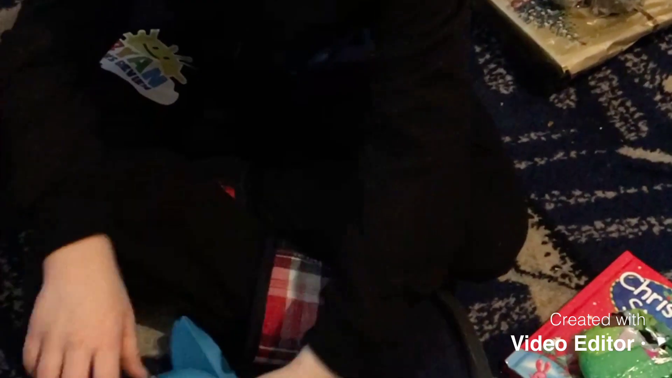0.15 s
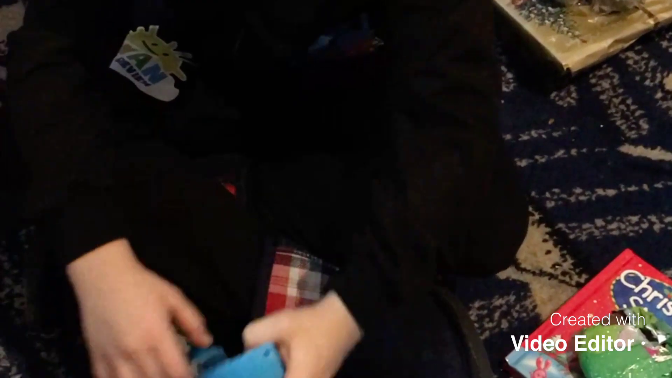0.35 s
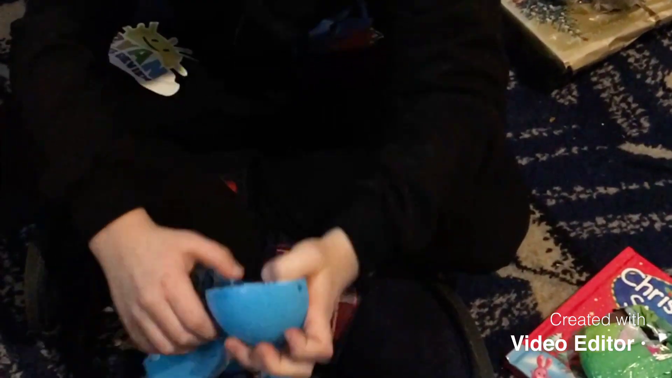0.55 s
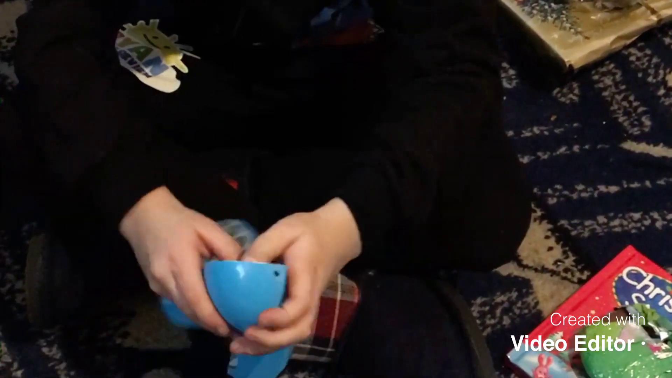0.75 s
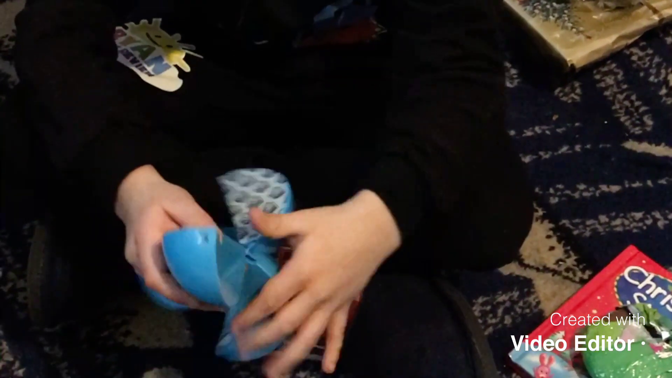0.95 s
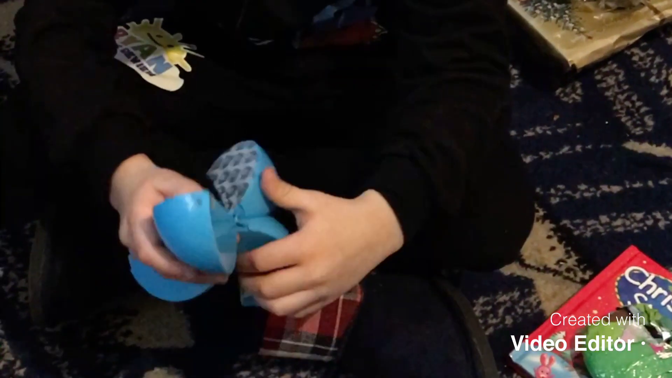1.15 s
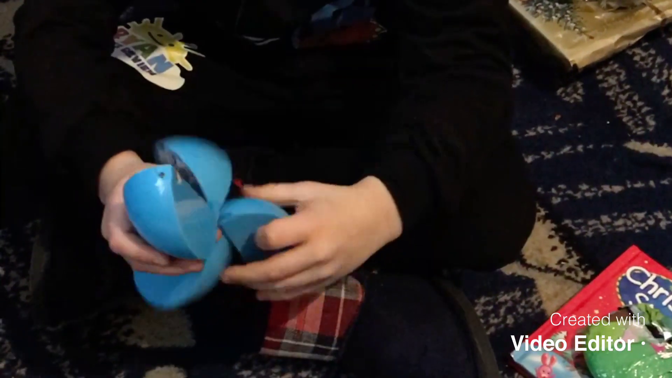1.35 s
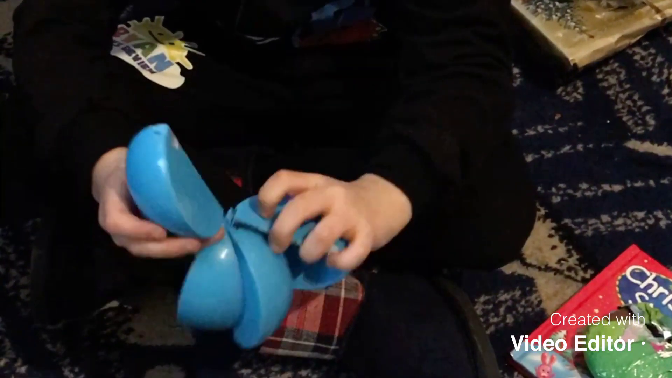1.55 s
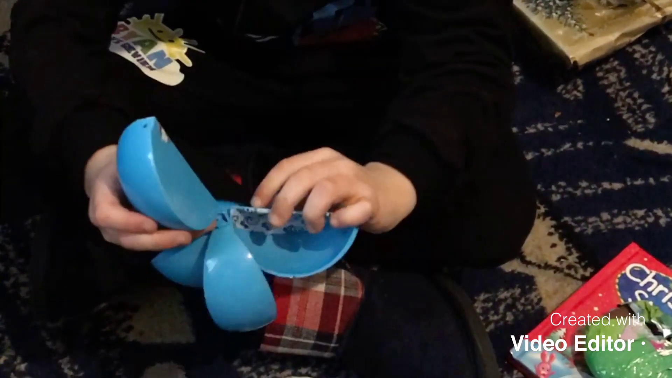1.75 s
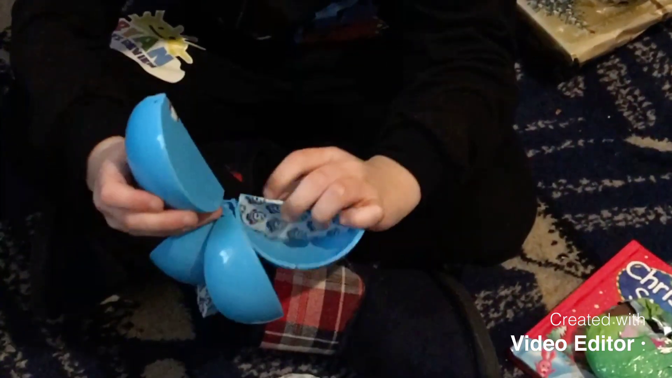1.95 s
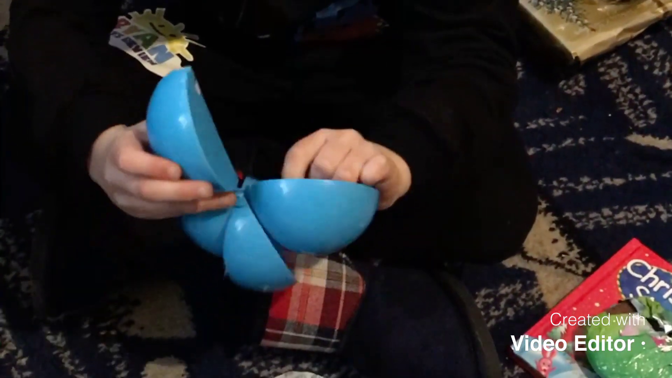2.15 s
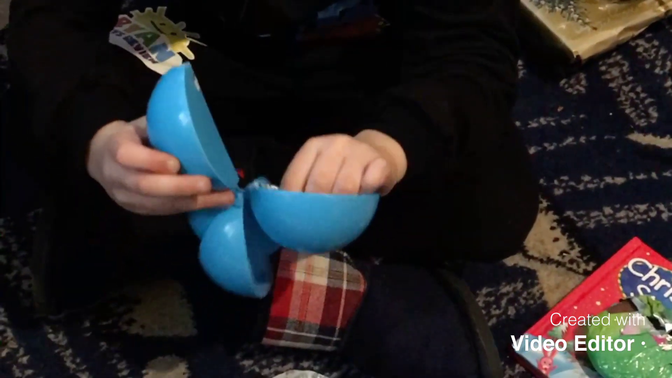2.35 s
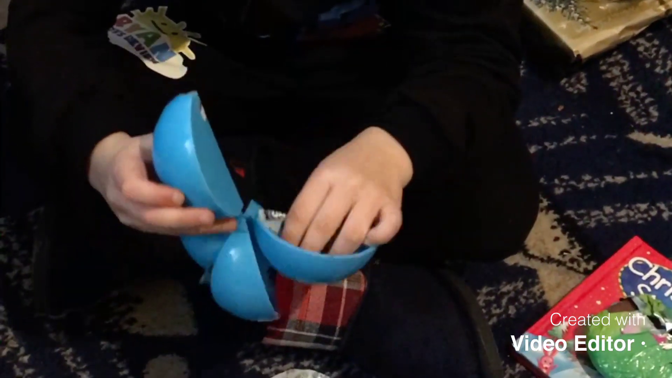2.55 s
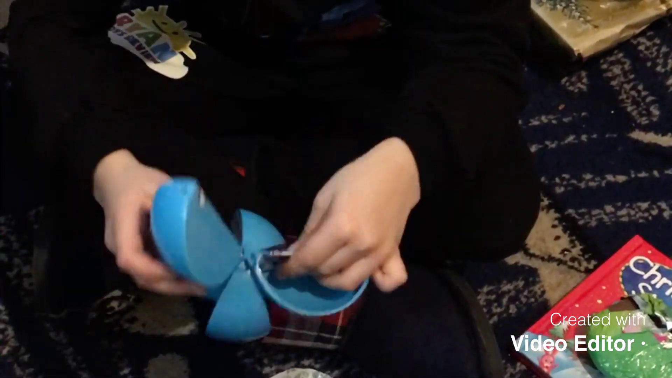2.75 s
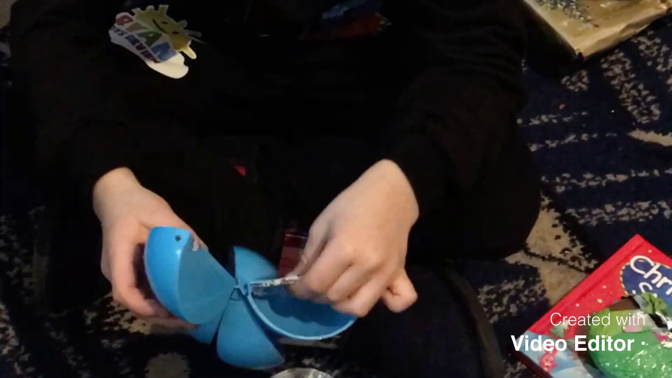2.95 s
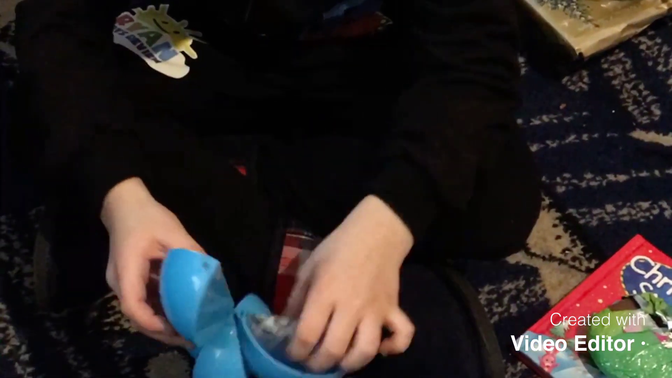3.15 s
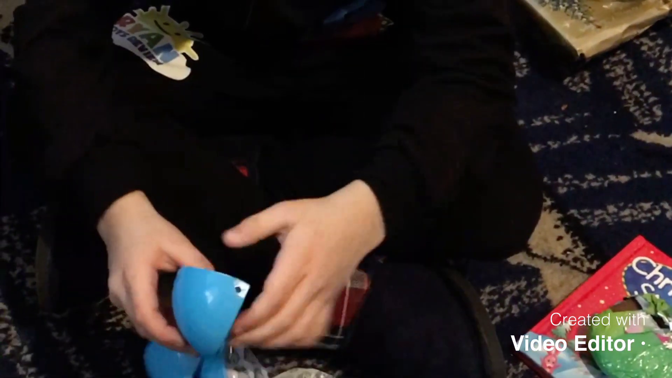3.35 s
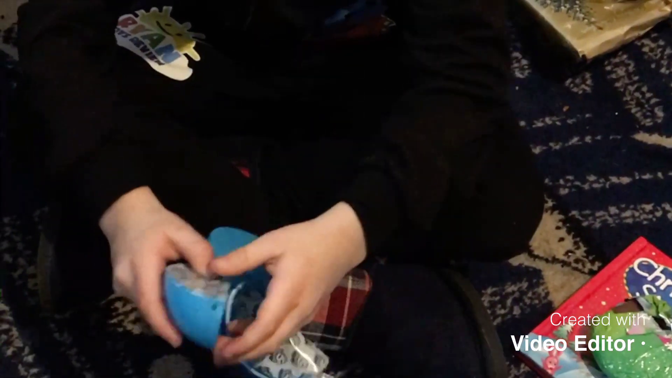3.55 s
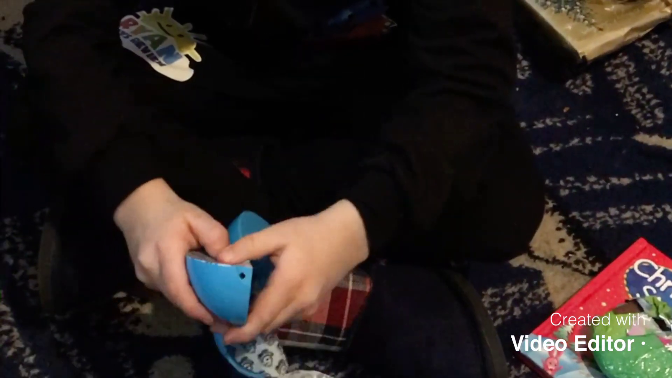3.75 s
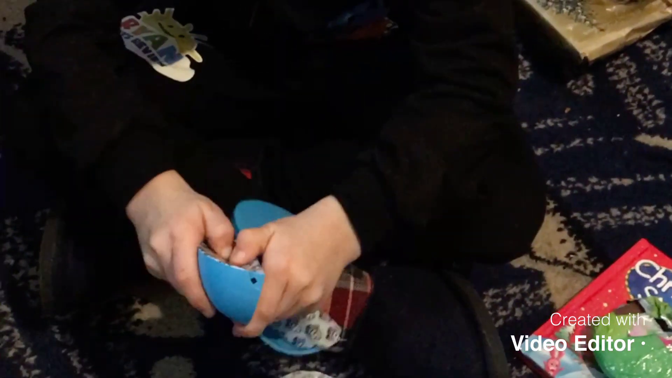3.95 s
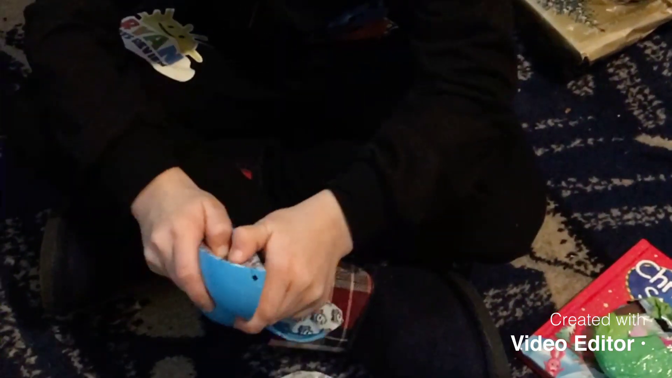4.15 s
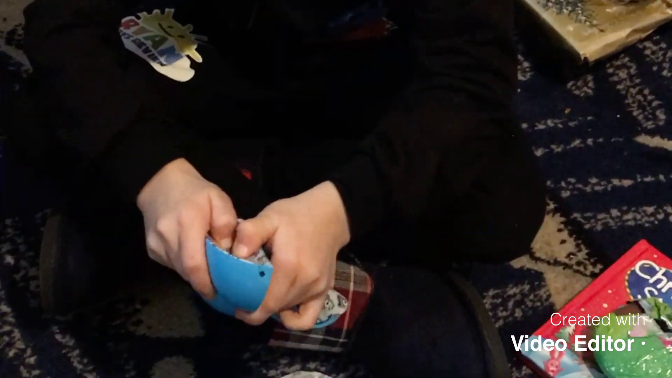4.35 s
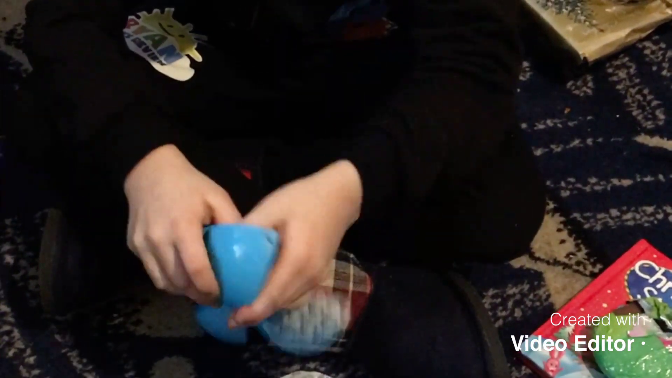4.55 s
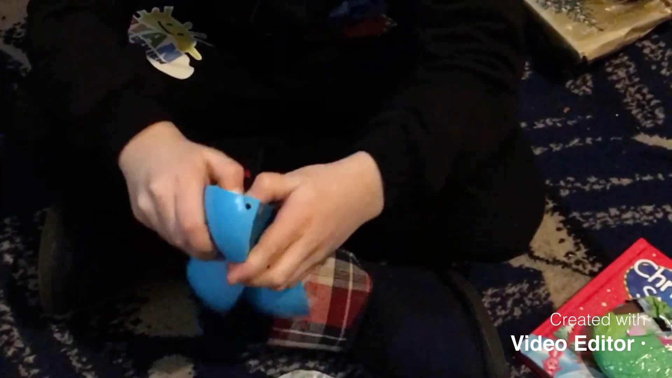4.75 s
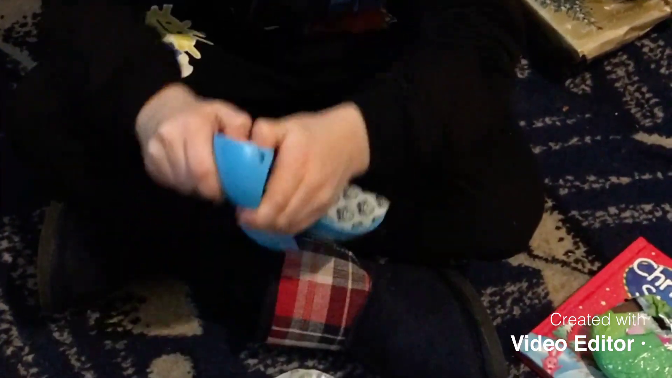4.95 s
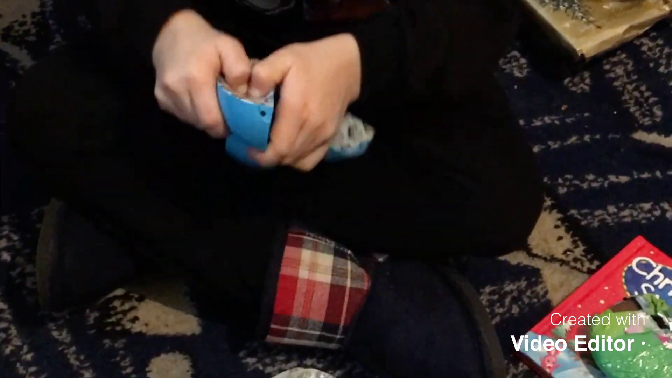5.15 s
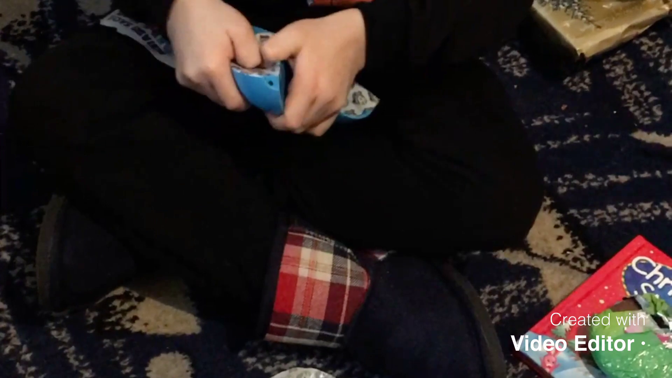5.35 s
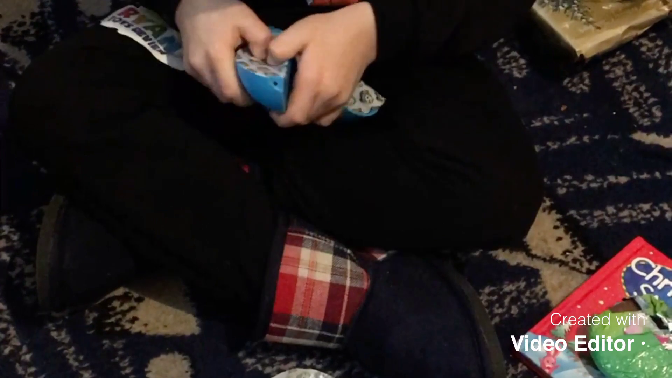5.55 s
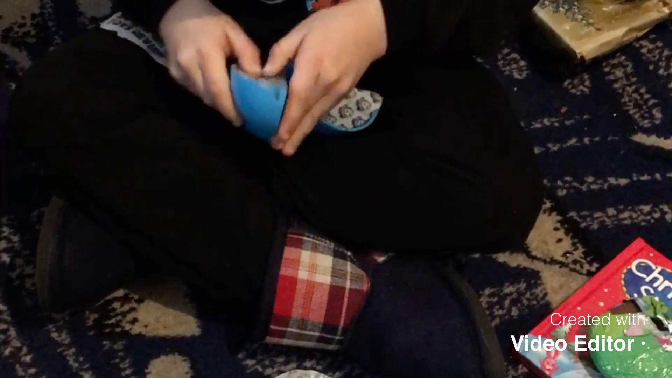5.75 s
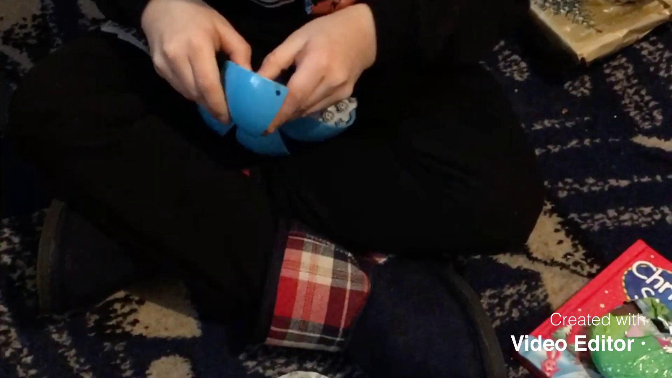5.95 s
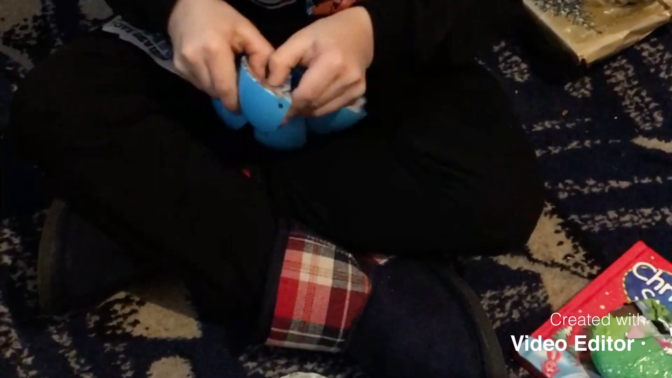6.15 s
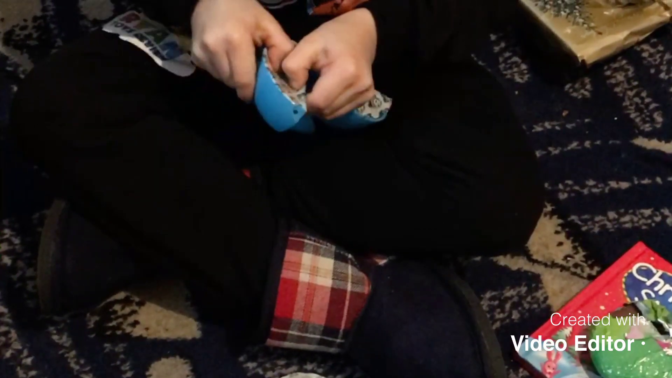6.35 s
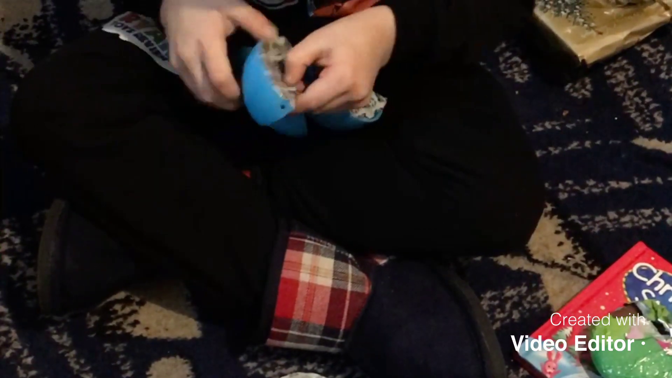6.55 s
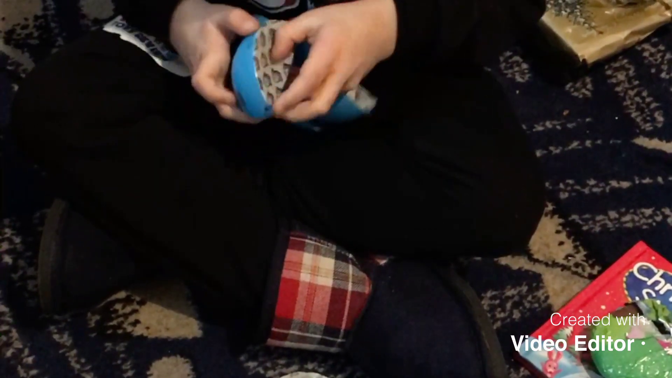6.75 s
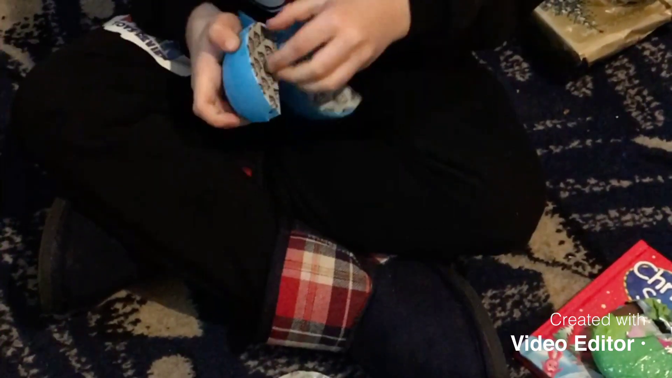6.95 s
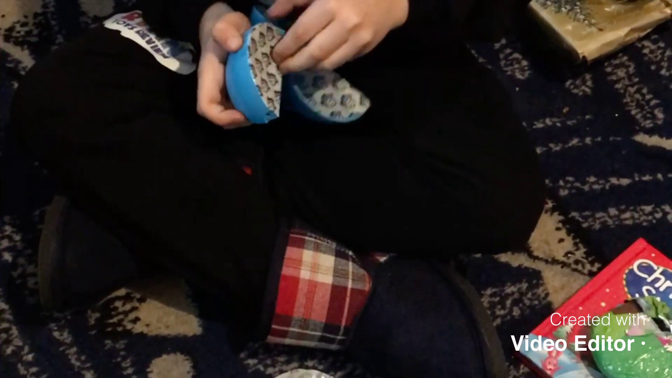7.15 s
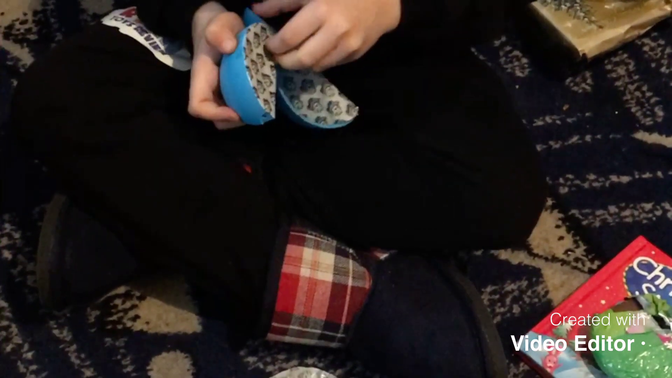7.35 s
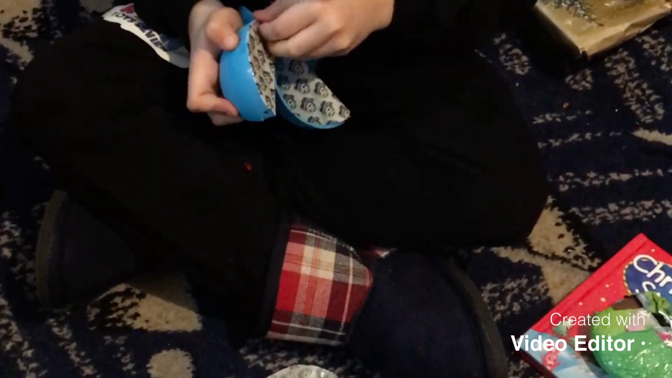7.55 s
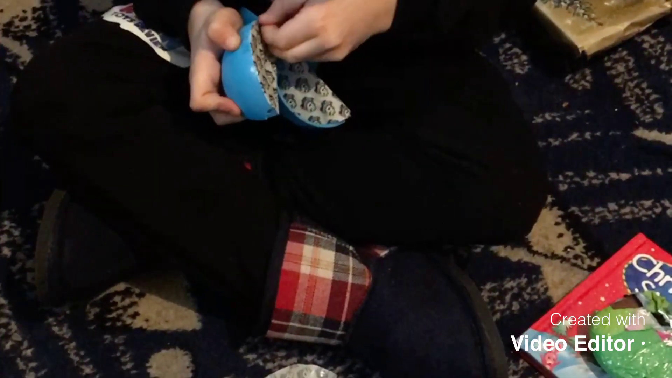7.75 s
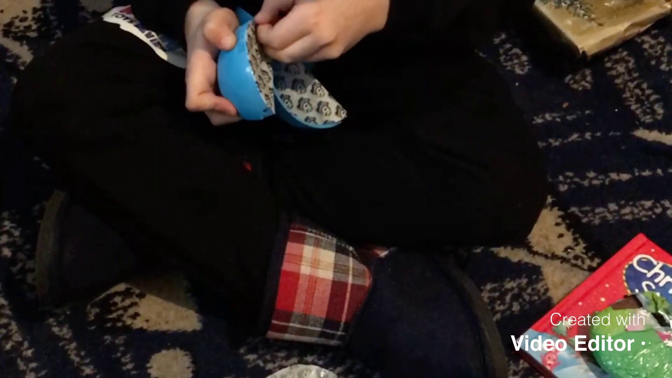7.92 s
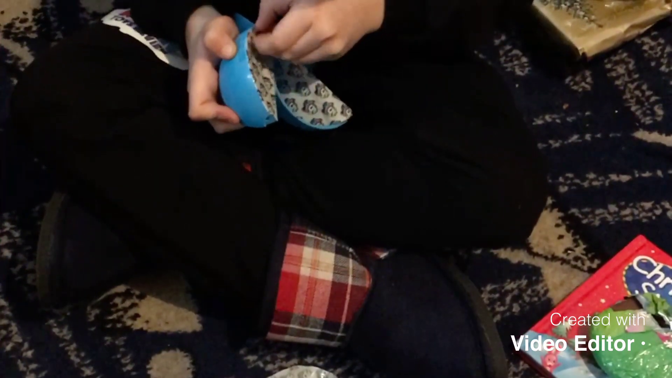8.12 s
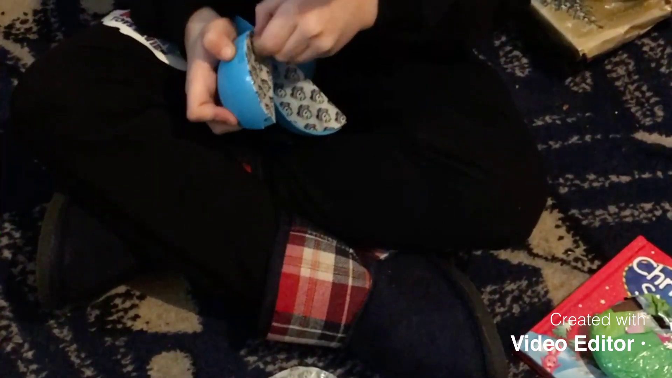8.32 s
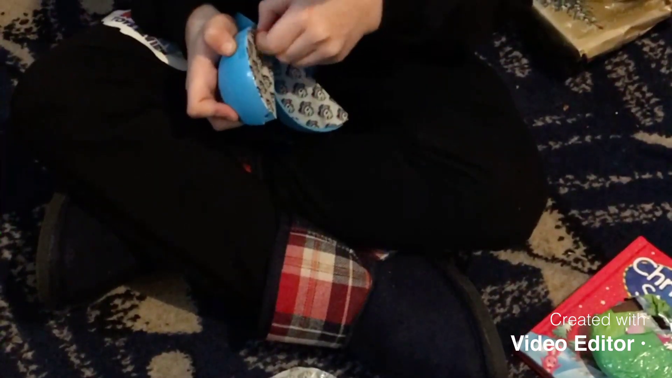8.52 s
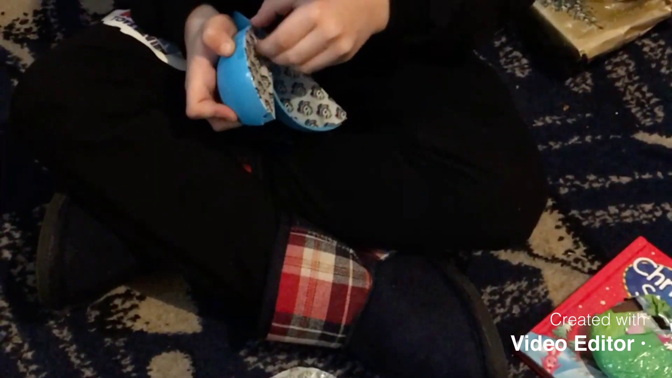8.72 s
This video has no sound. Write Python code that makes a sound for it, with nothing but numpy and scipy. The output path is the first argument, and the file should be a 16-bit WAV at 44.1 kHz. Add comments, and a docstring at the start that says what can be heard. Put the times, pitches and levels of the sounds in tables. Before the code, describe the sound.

In a small quiet room, hands manipulate a hard, hollow plastic capsule with hinged segments, heard close and in mono. From 0.1 to 1.7 seconds irregular knocks, clicks and scrapes crowd together, with a bright clack near 0.7 and a dense cluster around 1.5. It then thins, with a short scrape at 2.0 and small snaps and crinkling film from about 2.4 to 3.2. A very sharp clack lands at 2.8. Knocks resume at 3.6, with a brief strong scrape at 4.1 and the hardest clacks at 4.7, followed by a rattle until 5.2. From 5.4 to 7 seconds, softer taps and rubbing mix with scattered clicks. Dull low thuds bump around 7.4 to 7.6, then only faint hollow taps and light scrapes remain until nearly 9. A soft low rumble and slight hiss continue throughout.

```python
"""Hands twist and prise open the hinged segments of a hard plastic toy capsule in a small, quiet room.
Knocks and scrapes crowd the first second and a half; small snaps and film crinkling fill the third second.
The hardest knocks come at 2.8 s and 4.7 s; later ones thin out among soft taps, ending faint and hollow.
Each contact rings the hollow shell's modes briefly, and friction excites them with tiny slips.
Filtered noise makes the low rumble throughout; dull thuds lie near the start and after 7 s."""
import sys
import numpy as np
from scipy import signal
from scipy.fft import rfft, irfft, next_fast_len
from scipy.io import wavfile

SR = 44100
rng = np.random.default_rng(int(sys.argv[2]) if len(sys.argv) > 2 else 0)


def unload_audio(sound):
    """Save the sound as a 16-bit wav file, at the path given as the first command line argument."""
    columns = np.transpose(np.atleast_2d(sound))
    # keep every value between -1 and 1, then stretch to whole-number steps
    steps = np.round(np.clip(columns, -1, 1) * 32767)
    wavfile.write(sys.argv[1], SR, steps.astype(np.int16))


N = 387198  # length in samples


def amp(db):
    """Turn decibels into a gain."""
    return 10 ** (np.asarray(db) / 20)


def unit(x):
    """Scale a sound to an rms of 1."""
    return x / np.sqrt(np.mean(x ** 2) + 1e-20)


def head(x):
    """Scale a sound so that its first 6 ms or so have an rms of 1."""
    return x / np.sqrt(np.mean(x[:SR // 170] ** 2) + 1e-20)


def along(points, hz):
    """Read a curve of (Hz, value) points on a logarithmic frequency axis."""
    point_hz, value = np.transpose(points)
    return np.interp(np.log(hz + 1), np.log(point_hz), value)


def filtered(x, response):
    """Multiply the spectrum of a sound by a response, given as a function of frequency."""
    size = next_fast_len(len(x) + 2048)
    spectrum = rfft(x, size) * response(np.fft.rfftfreq(size, 1 / SR))
    return irfft(spectrum, size)[:len(x)]


def coloured(x, spectrum):
    """Give a sound the colour of a (Hz, dB) curve, at an rms of 1."""
    return unit(filtered(x, lambda hz: amp(along(spectrum, hz))))


def band(hz, lo, hi):
    """Gain of a band with steep edges; only a low edge below 800 Hz falls away gently."""
    low_order = 4 if lo < 800 else 26
    return 1 / np.sqrt((1 + (lo / (hz + 1)) ** low_order) * (1 + (hz / hi) ** 24))


def add(track, s, sound):
    """Mix a sound into the track from time s in seconds."""
    i = int(np.clip(round(s * SR), 0, len(track) - 1))
    track[i:i + len(sound)] += sound[:len(track) - i]


# How long the room's answer lasts at each pitch.
# Each row: frequency in Hz, time to fade by 60 dB in seconds.
ROOM_FADE = [(150, 0.63), (600, 0.25), (2000, 0.26), (6000, 0.17), (15000, 0.12)]


def room(x, wet_db, gap=0.0048, build=0.0093):
    """Add a diffuse answer from the walls: noise that builds up after a short gap in seconds, then fades."""
    hz, t, z = signal.stft(rng.standard_normal(SR // 2), SR, nperseg=256)
    fade = amp(-60 * t / along(ROOM_FADE, hz)[:, None])
    tail = signal.istft(z * fade, SR, nperseg=256)[1]
    tail = tail * np.clip((np.arange(len(tail)) / SR - gap) / build, 0, 1)
    answer = amp(wet_db) * tail / np.linalg.norm(tail)
    answer[0] = 1  # the direct sound
    return signal.fftconvolve(x, answer)


# The four pitch regions of a contact: knock, shell, click and tick.
# Each row: low edge in Hz, high edge in Hz, fading time of the clatter relative to the contact's,
# clatter level against the ringing modes in dB.
REGISTERS = [(287, 1430, 0.75, 0.5), (1450, 2660, 1.36, -8), (2640, 7000, 0.89, -6), (6570, 30000, 0.4, 6)]
# The modes, or natural tones, of the hollow shell; the registers set their final levels.
# Each row: frequency in Hz, relative strength in dB, fading time relative to the contact's.
SHELL_MODES = [(627, -8.5, 0.89), (699.6, -1.5, 0.71), (929, -17, 2.85), (1034, -2.5, 0.69),
               (1083, 0.5, 0.49), (1203, 0.5, 0.5), (1285, -10, 0.59), (1470, -8, 1.5), (1607, 1.5, 0.72),
               (1766, -1, 0.87), (1970, 4.5, 0.59), (1975, -10.5, 1.89), (2151, -8.5, 1.76),
               (2348, 1, 0.51), (3020, -15, 0.89), (3210, 7, 0.28), (3670, 2, 0.46), (4070, -0.5, 0.41),
               (4470, -4, 0.41), (4680, -11, 1), (5620, 7, 0.19), (6260, -8.5, 0.63), (7260, 3.5, 0.17),
               (8300, -22.5, 0.44), (8800, 10.5, 0.23), (9520, 5.5, 0.22), (11400, -1, .6)]
# How the force of a contact is spread over pitch, shaping the clatter inside each register.
# Each row: frequency in Hz, relative strength in dB.
BLOW_FORCE = [(100, -21), (450, -9), (650, -6), (1100, -2), (2000, 8), (2700, 2), (3800, -1), (6000, -2),
              (9000, -13), (13000, -16.5), (16000, -25)]


def contact(levels, t60, main_hz, scatter_db=5, grip=0.008, rise_cycles=0.93,
            main_db=4.0, main_life=0.64, crack_db=5, crack_t60=0.00074,
            after_db=-21, after_t60=0.1224):
    """One contact: the struck segment's main mode and the shell's modes ring over a dense clatter."""
    t = np.arange(SR // 6) / SR
    mode_hz, mode_db, life = np.transpose(SHELL_MODES)
    strength, detune, phase = rng.standard_normal((3, len(SHELL_MODES), 1))
    modes = amp(mode_db[:, None] + scatter_db * strength - 60 * t / (t60 * life[:, None]))
    # the grip of the fingers detunes each mode a little
    held_hz = mode_hz[:, None] * (1 + grip * detune)
    modes = modes * np.sin(2 * np.pi * (held_hz * t + phase))
    main = amp(-60 * t / (t60 * main_life)) * np.sin(2 * np.pi * (main_hz * t + rng.random()))
    crack = amp(crack_db - 60 * t / crack_t60)
    neighbours = amp(after_db - 60 * t / after_t60)  # faint ringing of loose neighbouring parts

    sound = np.zeros(len(t))
    for (lo, hi, hold, clatter_db), db in zip(REGISTERS, levels):
        clatter = filtered(rng.standard_normal(len(t)),
                           lambda hz: band(hz, lo, hi) * amp(along(BLOW_FORCE, hz)))
        segment = amp(-60 * t / (t60 * hold))
        clatter = clatter * (crack + segment + neighbours)
        ring = head(modes[(mode_hz > lo) & (mode_hz < hi)].sum(0))
        if lo <= main_hz < hi:
            ring = ring + amp(main_db) * head(main)
        # bending waves carry the treble first, so low registers swell a little later
        onset = 1 - np.exp(-t * np.sqrt(lo * hi) / rise_cycles)
        # each register's level is that of its first few milliseconds
        sound += amp(db) * head(onset * (head(ring) + amp(clatter_db) * head(clatter)))
    return sound


CONTACT_WET_DB = -10.0  # the room's answer to every knock, snap and tap
RING_S, RING_DOUBLING_DB = 0.05, 39.5  # 60 dB fading time at hardness 0; hardness in dB that doubles it
TICK_DB, TICK_GROWTH = -5, 1.15  # tick against shell at hardness 0, in dB; its dB per dB of hardness
# Rims and hinges knocking together.
# Each row: start in seconds, level of the shell register in dB, hollowness (knock against shell) in dB,
# hardness (click against shell) in dB, main mode of the struck segment in Hz.
KNOCKS = [(0.0948, -48, 0, -4.5, 3140), (0.1353, -53, 1.5, -0.5, 1970), (0.2946, -41, 2.5, -8.5, 1304),
          (0.3591, -49.5, 2.5, 9.5, 3320), (0.385, -35.5, -2.5, -6, 1454), (0.4067, -42, -9, -10, 1560),
          (0.4172, -41, 1.5, -3, 1555), (0.488, -42, 0.5, -16, 1570), (0.58, -42, -6.5, -2.5, 2020),
          (0.6108, -34, 4.5, 1.5, 1234), (0.647, -41.5, -6, -5, 3240), (0.6836, -29.5, -11, -7.5, 2380),
          (0.987, -35.5, -7, -11, 1810), (1.0426, -39, -7, -8, 1840), (1.0636, -38, 3.5, -11, 1136),
          (1.0704, -41.5, -4, 2, 2020), (1.2135, -48, -6, -5.5, 1990), (1.3225, -35.5, -12, -13.5, 1630),
          (1.3728, -40, -3, -10, 1500), (1.4, -39.5, 3.5, -11.5, 1125), (1.468, -37, -12, -19, 1890),
          (1.4986, -36.5, -7.5, -4, 1450), (1.5064, -34.5, -4, -10, 1860), (1.541, -38.5, -9, -13, 2020),
          (1.566, -34.5, -6.5, -12, 1890), (1.5852, -32.5, -5, -2, 2110), (1.6332, -31.5, -1.5, -13, 1390),
          (2.0312, -40.5, -16, -3.5, 2285), (2.2294, -41.5, 3, -9, 1610), (2.6615, -42, -16.5, -6, 1840),
          (2.7523, -32.5, -16, -3, 3830), (2.7637, -26, -11, -4.5, 2140), (2.77, -21, -21, -14, 1954),
          (2.7786, -35, -10.5, -1, 1850), (3.197, -46.5, -11, -10, 1460), (3.2484, -46, -2, 0.5, 1640),
          (3.5717, -35.5, -15, -8.5, 2090), (3.5786, -33, -13, -16, 1560), (3.601, -41, -8, -4, 1490),
          (3.6405, -31, -12.5, -9.5, 1494), (3.833, -30.5, -6, -11, 2070), (3.981, -52, -4.5, -13, 1860),
          (4.147, -31, -4, -1, 2095), (4.437, -44.5, -13.5, -8.5, 2070), (4.4856, -34, -13, -11.5, 2074),
          (4.6198, -35, -4, -11.5, 1870), (4.6613, -27.5, -16, -8.5, 1930), (4.704, -44, -5, -4, 1550),
          (4.7226, -23, -14, -8, 1980), (4.7532, -20.5, -12.5, -3, 2015), (4.8589, -34, -6.5, -17, 1480),
          (4.9525, -30.5, -5.5, -3.5, 2380), (5.0379, -25, -9.5, -7, 2140), (5.0538, -34.5, -18, -7, 2280),
          (5.0704, -37, -12, -7, 2120), (5.1267, -39.5, -20, -9.5, 2570), (5.1427, -36.5, 0.5, -13.5, 1980),
          (5.1734, -30, -9.5, -8.5, 2130), (5.2412, -38, -9, -5, 2110), (5.4745, -36.5, 0.5, -3.5, 2290),
          (5.888, -29, -2, -4.5, 2250), (5.9037, -31, -22, -19, 2010), (5.9562, -43, 0, -4.5, 1068),
          (6.2795, -47, -1.5, 0, 1213), (6.493, -31.5, -1.5, -4, 1980), (6.569, -44, -18, -8, 1465),
          (6.686, -31.5, -10, -11, 1666), (6.7061, -44, -2, 1.5, 1820), (6.7613, -39.5, -6, -9.5, 2200),
          (6.873, -46.5, -16, -9, 2680), (6.8904, -42, -9, 1, 3740), (6.966, -31.5, -1.5, 1.5, 3710),
          (7.069, -49, -7, -6, 1550), (7.091, -50.5, 0.5, -1.5, 1956), (7.1895, -58, 7.5, 5, 1280),
          (7.2468, -48.5, 1, -4.5, 986), (7.472, -41, -4.5, -15, 1590), (7.5937, -50, 0, -6, 2020),
          (8.0874, -56, 11, -0.5, 1434), (8.234, -53, 6.5, -2, 1390), (8.3876, -49.5, 8.5, -2, 1370),
          (8.6892, -46.5, 3.5, 6, 4410)]


def knocks():
    """Rims and hinges strike the shell; fingers damp soft blows, while hard ones are brighter and ring on."""
    track = np.zeros(N)
    for s, db, hollow, hard, main_hz in KNOCKS:
        levels = db + np.array([hollow, 0, hard, TICK_DB + TICK_GROWTH * hard])
        t60 = RING_S * 2 ** (hard / RING_DOUBLING_DB)
        add(track, s, room(contact(levels, t60, main_hz), CONTACT_WET_DB))
    return track


SNAP_DB, SNAP_RING_S = [-19, -5, 1, -2], 0.019  # dB added for knock, shell, click, tick; fading time
SNAP_HZ, SNAP_DB_PER_OCTAVE = 4500, 9  # the tick gains this much per octave above this pitch
# Bright snaps of small catches and of the seal.
# Each row: start in seconds, level in dB before the register settings above, pitch in Hz.
SNAPS = [(0.4971, -41.5, 3330), (1.3511, -39.5, 3750), (2.3737, -67, 8000), (2.4014, -51.5, 5900),
         (2.435, -55.5, 4570), (2.598, -52, 5600), (2.7333, -57, 5200), (2.8437, -46.5, 2970),
         (2.9422, -48.5, 3200), (2.9537, -56, 9050), (2.974, -40, 3770), (3.0126, -49, 3260),
         (3.046, -51, 5060), (3.1642, -50, 8640), (3.1807, -45.5, 4580), (3.497, -54.5, 5700),
         (3.91, -66, 5000), (4.0106, -58, 3130), (4.33, -54.5, 2960), (4.5816, -35, 3710),
         (7.8167, -52, 3870), (8.065, -55.5, 9100)]


def snaps():
    """Small catches and the seal ring the shell briefly; smaller parts snap higher and sharper."""
    track = np.zeros(N)
    for s, db, pitch in SNAPS:
        levels = db + np.array(SNAP_DB, dtype=float)
        levels[3] += SNAP_DB_PER_OCTAVE * np.log2(pitch / SNAP_HZ)
        add(track, s, room(contact(levels, SNAP_RING_S, pitch), CONTACT_WET_DB))
    return track


TAP_DB = [4.5, -0.5, -9, -17]  # dB added for knock, shell, click and tick
TAP_RING_S, TAP_HZ = 0.031, 1320  # 60 dB fading time; main mode
# Soft fingertip taps on the hollow shell.
# Each row: start in seconds, level in dB before the register settings above.
TAPS = [(0.0077, -48.5), (0.473, -52), (0.8599, -55.5), (0.9198, -63.5), (1.7533, -54), (1.8066, -60.5),
        (2.0789, -48), (3.4503, -68.5), (3.721, -56), (5.406, -57), (5.617, -66), (5.675, -63.5),
        (5.712, -68), (5.7492, -60), (5.768, -55), (5.8083, -57.5), (5.868, -51), (6.155, -53.5),
        (6.2317, -60), (6.3635, -64.5), (6.6087, -53), (6.933, -50), (7.4408, -62), (7.538, -52.5),
        (7.6071, -58.5), (7.9385, -63.5), (8.3722, -52), (8.4883, -59), (8.549, -61.5), (8.662, -56.5)]


def taps():
    """Soft fingertips ring mostly the low registers of the shell."""
    track = np.zeros(N)
    for s, db in TAPS:
        levels = db + np.array(TAP_DB)
        add(track, s, room(contact(levels, TAP_RING_S, TAP_HZ), CONTACT_WET_DB))
    return track


def slips(rate, spread_db, hiss_db):
    """Stick-slip: tiny jerks of very unequal size, about rate per second, over smooth friction noise."""
    sizes = amp(spread_db * np.clip(rng.standard_normal(N), -2, 2))
    jerks = (rng.random(N) < rate / SR) * rng.choice([-1, 1], N) * sizes
    return unit(jerks) + amp(hiss_db) * rng.standard_normal(N)


def shell_ring(x, t60, clatter_db, scatter_db):
    """Friction at one spot favours its own few resonances of the shell."""
    t = np.arange(SR // 10) / SR
    ring = np.zeros(len(t))
    for hz, db, life in SHELL_MODES:
        strength = db + scatter_db * rng.standard_normal()
        ring += amp(strength - 60 * t / (t60 * life)) * np.sin(2 * np.pi * (hz * t + rng.random()))
    clatter = rng.standard_normal(len(t)) * amp(-120 * t / t60)  # fades twice as fast
    return signal.oaconvolve(x, unit(ring) + amp(clatter_db) * unit(clatter))[:N]


def stroke(start, length, attack=0.013, release=0.032):
    """A stroke's loudness: a straight rise, a hold, then a fade with the release as its time constant."""
    t = np.arange(N) / SR - start
    return np.clip(t / attack, 0, 1) * np.exp(-np.maximum(t - length, 0) / release)


# Strokes of the hands; rubbing() trims both levels by its own settings.
# Each row: start in seconds, time until the fade in seconds, plastic scraping in dB, film crinkling in dB.
STROKES = [(0.097, 0.065, -53, -61), (0.283, 0.29, -52, -62.5), (0.566, 0.21, -46, -65.5),
           (0.963, 0.15, -48.5, -58), (1.333, 0.23, -45.5, -63), (1.584, 0.18, -61, -68.5),
           (2.008, 0.034, -45, -57.5), (2.162, 0.036, -57.5, -58.5), (2.28, 0.078, -80, -69),
           (2.583, 0.08, -65, -58.5), (3.002, 0.062, -53.5, -52), (3.146, 0.096, -56.5, -63),
           (4.135, 0.035, -39.5, -51), (4.573, 0.17, -44.5, -60), (4.967, 0.3, -50.5, -69),
           (5.312, 0.32, -61, -73), (5.77, 0.24, -57, -74), (6.523, 0.32, -51.5, -64),
           (6.907, 0.2, -47.5, -73), (7.12, 0.18, -61, -72), (7.379, 0.07, -67.5, -76),
           (7.486, 0.16, -56.5, -62.5), (7.677, 0.063, -65, -67), (7.95, 0.094, -72, -70),
           (8.083, 0.047, -62.5, -76), (8.213, 0.23, -59.5, -74), (8.654, 0.06, -59.5, -63)]
# Colour of plastic scraping. Each row: frequency in Hz, relative strength in dB.
SCRAPE_COLOUR = [(100, -28), (250, -5.5), (430, -18.5), (700, -8.5), (1300, -1), (1950, -4.5), (2800, -8),
                 (3600, -15.5), (5000, -20), (16000, -41)]
# Colour of the crinkling film. Each row: frequency in Hz, relative strength in dB.
FILM_COLOUR = [(500, -35.5), (2000, 2), (3500, -2.5), (6500, 1.5), (10000, -5.5), (16000, -9)]


def rubbing(scrape_db=-3, film_db=-3, count=6):
    """Plastic slides on plastic at several spots, and the thin seal crinkles under the fingers."""
    # hands that only hold the capsule still rub faintly (scrape, film; dB before the trims)
    gains = amp([[-86], [-87]])
    for start, length, scrape_level, film_level in STROKES:
        gains = np.maximum(gains, amp([[scrape_level], [film_level]]) * stroke(start, length))
    scrape = np.zeros(N)
    for _ in range(count):
        spot = slips(rate=25, spread_db=5, hiss_db=-9)
        scrape += shell_ring(spot, t60=.025, clatter_db=-1.0, scatter_db=12.5)
    scrape = amp(scrape_db) * gains[0] * coloured(scrape, SCRAPE_COLOUR)
    film = coloured(slips(rate=700, spread_db=5, hiss_db=-1), FILM_COLOUR)
    film = amp(film_db) * gains[1] * film
    return room(scrape + film, wet_db=-12.5)[:N]


# Dull thuds.
# Each row: time of the peak in seconds, level at the peak in dB, pitch in Hz,
# time from the peak down to about a third (1/e) in seconds.
THUDS = [(.08, -58, 68, 0.19), (0.776, -61, 85, 0.087), (7.363, -61.5, 130, 0.15), (7.408, -57, 112, 0.036),
         (7.454, -54, 90, 0.051), (7.618, -52.5, 116.2, 0.041)]


def thuds(width=0.31, wool_db=-4):
    """Soft, low bumps: a dull boom in a woolly rumble, swelling and fading without a click."""
    t, track = np.arange(N) / SR, np.zeros(N)
    for s, db, pitch, length in THUDS:
        boom = unit(np.sin(2 * np.pi * (pitch * t + rng.random())))
        wool = unit(filtered(rng.standard_normal(N),
                             lambda hz: 1 / (1 + ((hz - pitch) / (2 * width * pitch)) ** 2)))
        swell = np.exp(-((t - s) / length) ** 2)
        track += amp(db) * unit(boom / 2 + amp(wool_db) * wool) * swell
    return track


# Colour of the room's background. Each row: frequency in Hz, relative strength per Hz in dB.
AMBIENCE_COLOUR = [(20, -17.5), (30, -8.5), (42, 7.5), (68, 6.5), (100, -0.5), (170, -9), (285, -7),
                   (460, -15.5), (1570, -14), (2670, -21), (6300, -26), (12000, -29.5), (16000, -34)]


def ambience(db=-63):
    """The room's steady rumble and faint hiss, made of coloured noise."""
    return amp(db) * coloured(rng.standard_normal(N), AMBIENCE_COLOUR)


def scene():
    """The capsule in its room, in mono."""
    return (knocks() + snaps() + taps() + rubbing() + thuds() + ambience())[None]


def record(dry):
    """Keep nothing above the band limit of 16.2 kHz."""
    return np.array([filtered(x, lambda hz: hz < 16200) for x in dry])


dry = scene()
out = record(dry)
unload_audio(out)
```